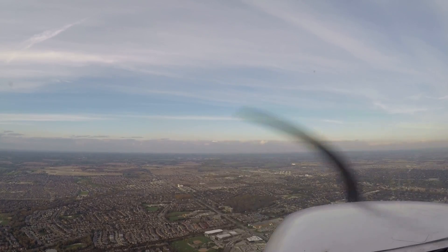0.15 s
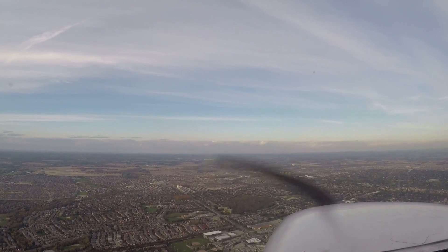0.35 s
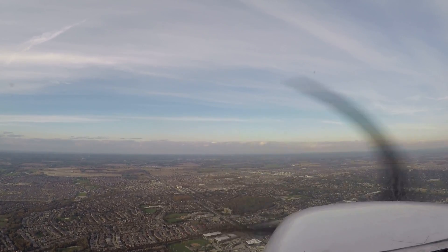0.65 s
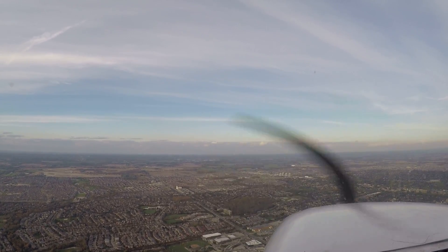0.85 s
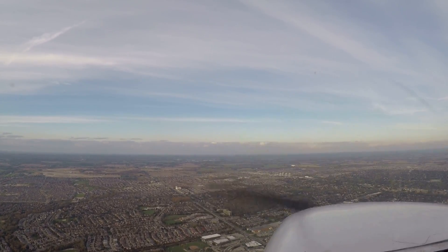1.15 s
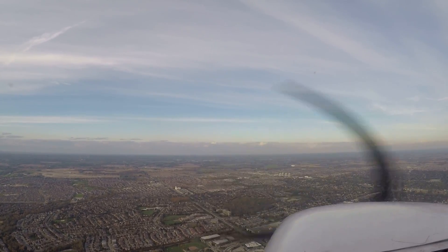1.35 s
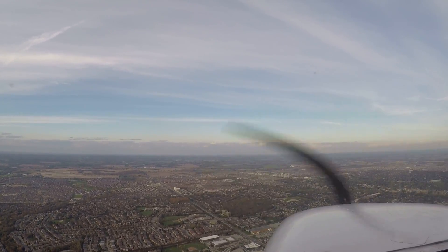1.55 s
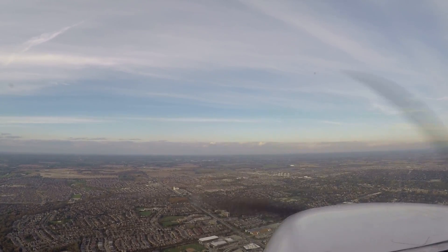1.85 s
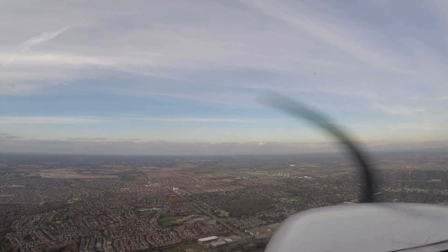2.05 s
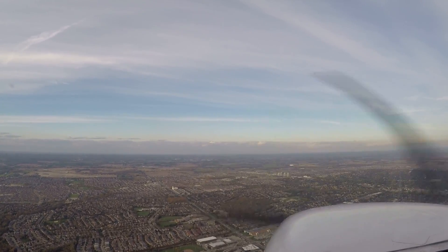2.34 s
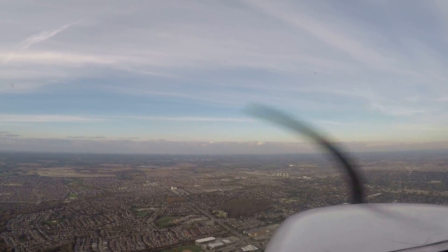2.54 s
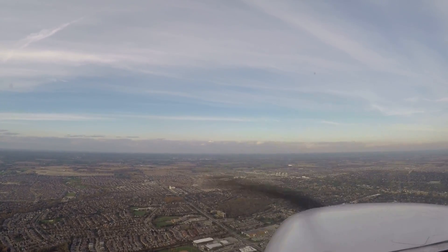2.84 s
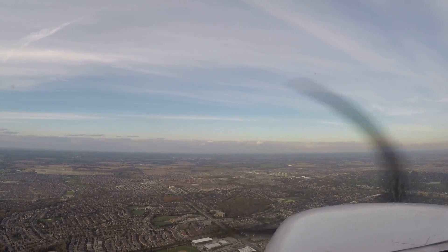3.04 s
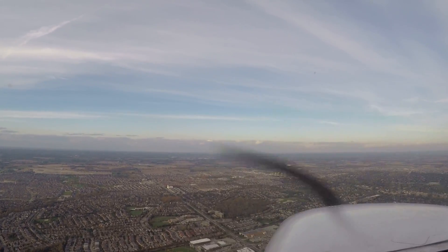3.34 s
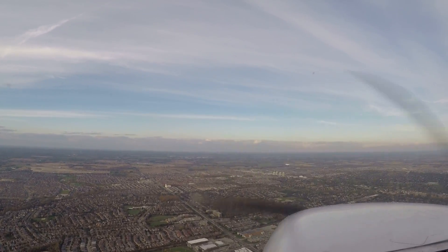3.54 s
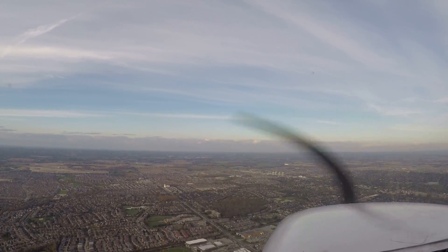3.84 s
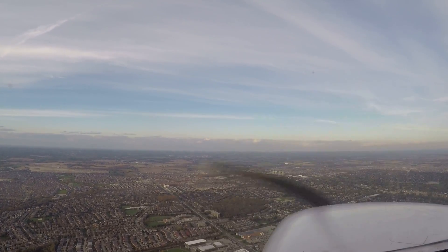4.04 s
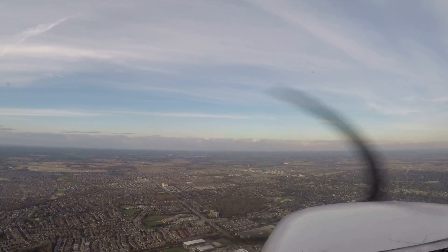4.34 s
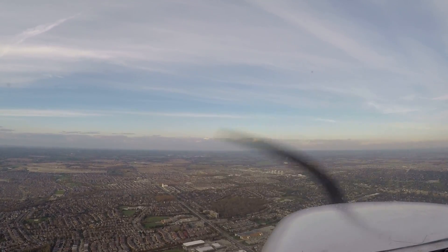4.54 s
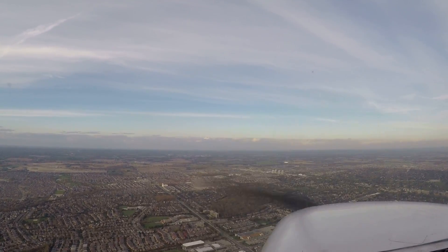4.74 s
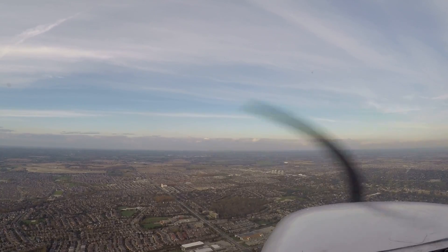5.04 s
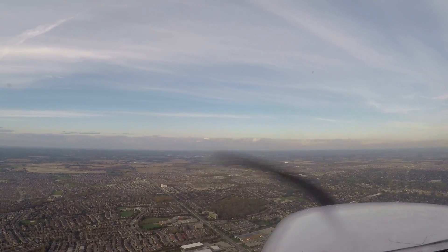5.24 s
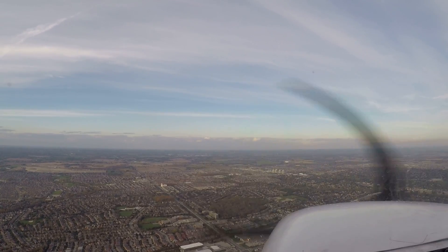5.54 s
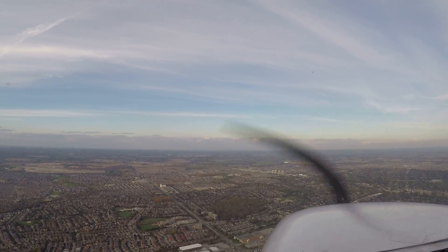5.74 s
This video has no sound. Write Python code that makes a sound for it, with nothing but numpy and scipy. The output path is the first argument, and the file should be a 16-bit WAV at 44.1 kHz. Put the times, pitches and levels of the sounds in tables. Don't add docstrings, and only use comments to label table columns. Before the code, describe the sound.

From 0 to about 5.9 seconds, a small piston aeroplane in level flight drones loudly and without a break, heard inside the cabin. The dominant sound is a deep, steady hum near 157 Hz, with weaker buzzing harmonics above; its pitch sinks almost imperceptibly. Uneven combustion makes boomy low resonances shudder and swell irregularly, notably near 2 seconds, easing around 2.3. Wind buffets the hull as low rumble, with a muffled mid roar and softer hiss pulsing slightly with the blades. A thin panel flutters hollowly near 0.9 seconds, more gently at 2.9, barely at 2.1 and 5.0. Tiny dry ticks from a loose fitting scatter throughout, busiest from 0.8 to 1.5 seconds, with the sharpest near 3.0 and 4.0. The microphone is close and enclosed, levelling swells and holding down peaks; the drone never stops, cut off mid-flight.

```python
import sys
import numpy as np
from scipy import signal
from scipy.fft import rfft, irfft, next_fast_len
from scipy.io import wavfile
from scipy.ndimage import uniform_filter1d, minimum_filter1d, map_coordinates

SR = 44100
rng = np.random.default_rng(int(sys.argv[2]) if len(sys.argv) > 2 else 0)


def gain_from_decibels(decibels):
    exponent = np.asarray(decibels, float) / 20
    return 10 ** exponent


def unload_wav(signal):
    wavfile.write(
        sys.argv[1],
        SR,
        np.round(np.clip(np.atleast_2d(signal).T, -1, 1) * 32767).astype(np.int16),
    )


N = 259749

# time in seconds, speed in turns per second.
SHAFT_SPEED = [(0, 39.2), (.59, 39.227), (1.18, 39.21), (1.77, 39.189), (2.36, 39.175), (2.94, 39.167),
               (4.12, 39.164), (4.71, 39.159), (5.3, 39.142), (5.89, 39.135)]
# frequency in Hz, density in dB per Hz.
ROAR_SPECTRUM = [(250, -46.5), (340, 6), (410, 2), (445, -3.5), (530, 1.5), (580, -0.5), (700, 0.5),
                 (900, -2), (1100, -6), (1400, -11.5), (1600, -12), (1900, -9.5), (2200, -19), (5000, -140)]


def unit(x):
    return x / np.sqrt(np.mean(x ** 2) + 1e-20)


def along(points, hz):
    point_hz, value = np.transpose(points)
    return np.interp(np.log(hz + 1), np.log(point_hz + 1), value)


def curves(rows):
    time_s, *columns = np.transpose(rows)
    return [np.interp(np.arange(N) / SR, time_s, column) for column in columns]


def wobble(knots_per_s):
    knots = rng.standard_normal(int(N * knots_per_s / SR) + 4)
    return map_coordinates(knots, [np.arange(N) * knots_per_s / SR])


def rush(spectrum, patchy_db, window=512):
    z = signal.stft(rng.standard_normal(N), nperseg=window)[2]
    patches = uniform_filter1d(rng.standard_normal(z.shape), size=5, axis=0)
    patches = uniform_filter1d(patches, size=9, axis=1)
    patchy = signal.istft(z * gain_from_decibels(patchy_db * unit(patches)), nperseg=window)[1][:N]
    size = next_fast_len(N + 8192)
    response = gain_from_decibels(along(spectrum, np.fft.rfftfreq(size, 1 / SR)))
    return unit(irfft(rfft(patchy, size) * response, size)[:N])


def slipstream(angle):
    # time in seconds, strength in dB.
    flow_rows = [(0, -34), (.15, -33), (.4, -33), (.7, -33), (1.12, -32.5), (1.35, -33.8), (1.55, -33),
                 (2.0, -35), (2.3, -34), (2.9, -34.5), (3.12, -33.5), (3.4, -35.5), (3.95, -33),
                 (4.25, -33), (4.42, -34.5), (5.0, -35), (5.3, -34), (5.89, -36)]
    # frequency in Hz, density in dB per Hz.
    buffet_spectrum = [(18, -27), (30, -13.5), (40, -1), (70, -1.5), (88, -0.5), (110, -2), (135, -3),
                       (170, -18.5), (250, -54.5), (500, -140)]
    hiss_spectrum = [(1290, -35), (2200, -0.5), (2900, -6), (3350, -4.5), (3640, -7.5), (3930, -2),
                     (4200, -4), (4600, -0.5), (5100, -4), (6980, -9.5), (7540, -16), (9090, -18.5),
                     (10000, -29), (11300, -36), (13000, -46.5), (15000, -58.5), (22000, -120)]

    flow_db, = curves(flow_rows)
    mean_db = flow_db.mean()
    swell_db = flow_db - mean_db
    wake = np.cos(2 * angle) + 0.42 * np.cos(angle + 1.2)
    gust = wobble(6.7)

    buffet = gain_from_decibels(-23 + swell_db) * rush(buffet_spectrum, patchy_db=0.2, window=4096)
    roar_db = mean_db + 11 + 1.8 * swell_db + 0.6 * wake + 0.7 * gust + 0.38 * wobble(6.02)
    roar = gain_from_decibels(roar_db) * rush(ROAR_SPECTRUM, patchy_db=1.0, window=1024)
    hiss_db = flow_db + 0.4 * wake + 0.55 * gust
    hiss = gain_from_decibels(hiss_db) * rush(hiss_spectrum, patchy_db=0.63)
    return buffet + roar + hiss


def panel():
    # time in seconds, peak level in dB.
    flutters = [
        (.92, -24),
        (2.08, -38.5),
        (2.9, -32.5),
        (4.99, -38.5),
    ]
    # frequency in Hz, density in dB per Hz.
    panel_spectrum = [(380, -120), (490, -18), (525, 3), (560, -12.5), (700, -120)]
    rest_db, half_length_s = -40.5, 0.1
    t = np.arange(N) / SR
    swell = gain_from_decibels(rest_db)
    for start_s, peak_db in flutters:
        swell = swell + gain_from_decibels(peak_db) * np.exp(-((t - start_s) / half_length_s) ** 2)
    return swell * rush(panel_spectrum, patchy_db=2.5, window=3800)


def ring(modes, t):
    x = np.zeros(len(t))
    for hz, db, t60_s in modes:
        decay_db = db + rng.normal(0, 1.5) - 60 * t / t60_s
        x += gain_from_decibels(decay_db) * np.sin(2 * np.pi * hz * t)
    rise_s = 0.0004
    x = x * (1 - np.exp(-t / rise_s)) ** 2
    return x / np.abs(x).max()


def fitting(angle):
    # time in seconds, peak in dB, low-mode level in dB.
    clear = [(0.0344, -31, -3), (0.187, -27, -4), (0.2768, -24, -7), (0.6064, -27, -7), (0.8004, -28, -2),
             (0.8245, -26, -3), (0.8704, -27, -5), (0.9522, -26, -6), (1.0794, -28, -2), (1.1049, -22, -5),
             (1.1824, -26, -7), (1.2271, -26, -5), (1.2974, -28, -5), (1.4107, -26, -7), (1.4486, -28, -5),
             (1.6234, -26, -6), (1.8447, -27, -6), (2.1331, -28, -7), (2.8659, -26, -4), (2.9816, -19, -4),
             (3.8884, -26, -4), (3.9509, -25, -1), (4.0402, -19, -4), (4.5131, -27, -2), (4.577, -25, -6),
             (4.8199, -27, -6), (5.2034, -28, -5), (5.228, -27, -5), (5.6111, -29, -2)]
    # frequency in Hz, level in dB, t60 in seconds.
    low_modes = [(1800, -3, .01), (2300, 0, .012), (2900, -1, .01), (3600, -3, .008)]
    high_modes = [(6200, 0, .013), (6900, -5, .009), (7700, -6, .009), (8500, -11, .007)]

    firings_s = np.flatnonzero(np.diff(np.floor(angle / np.pi))) / SR
    faint = []
    for firing_s in firings_s:
        strength, pick = rng.uniform(size=2)
        if pick < 0.3:
            faint.append((firing_s, -32 + 3.5 * np.log(strength + 1e-3), -3))

    out = np.zeros(N + SR)
    t = np.arange(SR // 50) / SR
    for start_s, peak_db, low_db in list(clear) + faint:
        tap = ring(high_modes, t) + gain_from_decibels(low_db + 9) * ring(low_modes, t)
        tap_db = peak_db + 0.25 * (peak_db + 19) - 0.5
        first = round((start_s + 0.0002) * SR)
        out[first:first + len(t)] += gain_from_decibels(tap_db) * tap
    return out[:N]


def cabin_booms(angle):
    # time in seconds, unevenness in dB, lean to the higher boom in dB.
    burns = [(0, -15, 0.5), (.25, -12, -2), (.6, -13.5, -2), (.95, -14.5, -1.5), (1.3, -12, 3.5),
             (1.5, -14, 1), (1.65, -15.5, -3.5), (1.95, -9, 2.5), (2.28, -19.5, -1.5), (2.53, -10.5, 2),
             (2.85, -16.5, 0), (3.1, -17.5, -3.5), (3.35, -13.5, 2), (3.6, -16, 0), (3.9, -15, -4.5),
             (4.4, -12, 3.5), (4.9, -12, 1), (5.89, -16, 1.5)]
    # frequency in Hz, density in dB per Hz.
    low_spectrum = [(90, -51.5), (130, -5), (155, 8.5), (200, 9.5), (225, 4), (250, 0), (330, -56.5),
                    (700, -140)]
    high_spectrum = [(170, -44), (215, -18), (240, 1), (270, 0), (315, -2), (335, -13), (365, -17),
                     (420, -27), (600, -86), (1200, -140)]
    scatter_db, scatter_knots_per_s = 1.65, 11

    uneven_db, lean_db = curves(burns)
    uneven_db = uneven_db + 1.25 * np.cos(angle / 2) + 1.7 * np.cos(angle + 0.7)
    low_db = uneven_db - lean_db - 5 + scatter_db * wobble(scatter_knots_per_s)
    high_db = uneven_db + lean_db - 4.6 + scatter_db * wobble(scatter_knots_per_s)
    low = gain_from_decibels(low_db) * rush(low_spectrum, patchy_db=0.5, window=4096)
    high = gain_from_decibels(high_db) * rush(high_spectrum, patchy_db=1.35, window=4096)
    return low + high


def tones(angle, orders, unsteady_db, drift_rad):
    order, level_db = np.transpose(orders)
    firing_phase = 0.27 * order * order
    start_rad = np.where(order % 2 == 0, firing_phase, rng.uniform(0, 2 * np.pi, len(order)))
    out = np.zeros(N)
    for k, db, start in zip(order, level_db, start_rad):
        gain = np.sqrt(2) * gain_from_decibels(db + unsteady_db * wobble(3.97))
        out += gain * np.sin(k * angle + start + drift_rad * wobble(5))
    return out


def engine(angle):
    # shaft order, level in dB rms.
    main_orders = [(1.0, -41), (2.0, -28), (2.5, -31), (4.0, -12), (4.5, -25), (5.5, -26.5), (6.0, -21),
                   (7.0, -34.5), (7.5, -32.5), (8.0, -21), (9.0, -35.5), (9.5, -36), (10.0, -28.5),
                   (10.5, -31.5), (11.0, -38.5), (12.0, -34), (14.0, -33.5), (15.0, -37.5), (15.5, -40.5),
                   (16.0, -38), (16.5, -40), (17.5, -47.5), (18.0, -30.5), (18.5, -38.5), (19.5, -45),
                   (21.0, -45), (22.0, -44.5), (22.5, -40.5), (23.0, -44), (24.0, -48)]
    skin_orders = [(31, -49.5), (32, -52.5), (36, -56), (39, -49)]

    half_orders = np.arange(49, 104) / 2
    mean_turns_per_s = np.mean(SHAFT_SPEED, axis=0)[1]
    skin_db = along(ROAR_SPECTRUM, half_orders * mean_turns_per_s)
    scatter_db = rng.normal(0, 2.5, len(half_orders))
    whole_db = 3 * (half_orders % 1 == 0)
    fall_db = 0.12 * (half_orders - 24)
    comb_db = -47 + skin_db + scatter_db + whole_db - fall_db
    comb = tones(angle, list(zip(half_orders, comb_db)), unsteady_db=-3.0, drift_rad=0.22)
    strong = tones(angle, list(main_orders) + list(skin_orders), unsteady_db=0.3, drift_rad=0.06)
    return strong + comb


def scene():
    turns_per_s, = curves(SHAFT_SPEED)
    angle = 2 * np.pi * np.cumsum(turns_per_s) / SR
    mix = slipstream(angle) + panel() + fitting(angle) + cabin_booms(angle) + engine(angle)
    return mix[None]


def top_cut(x):
    return signal.sosfilt(signal.butter(12, 15100, fs=SR, output="sos"), x)


def record(dry):
    averaging_s, depth = 0.046, 0.15
    power = np.abs(uniform_filter1d(dry ** 2, round(averaging_s * SR), axis=1)) / np.mean(dry ** 2)
    even = dry * (power + 1e-3) ** (-depth / 2)
    need = np.minimum(1, 0.94 / (np.abs(even) + 1e-9))
    held = minimum_filter1d(need, size=441, axis=1)
    gain = uniform_filter1d(held, size=441, axis=1)
    return top_cut(even * gain)


dry = scene()
out = record(dry)
unload_wav(out)
```